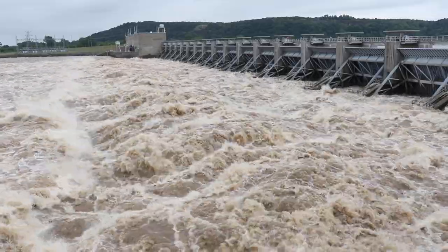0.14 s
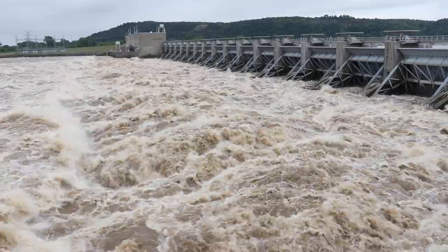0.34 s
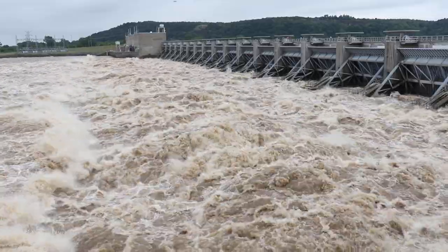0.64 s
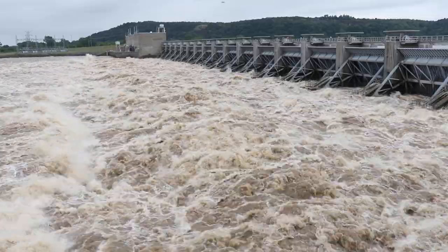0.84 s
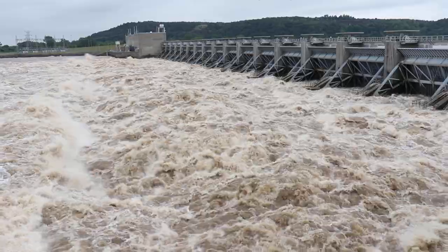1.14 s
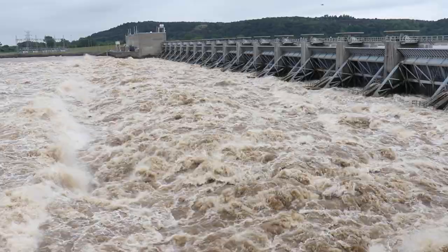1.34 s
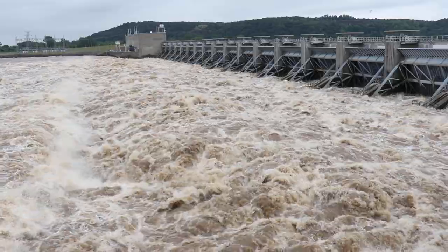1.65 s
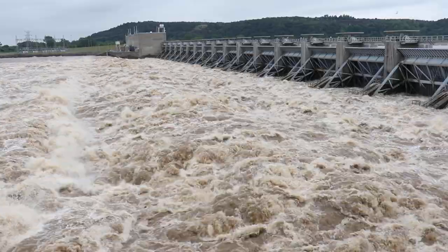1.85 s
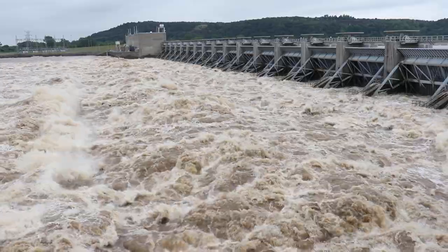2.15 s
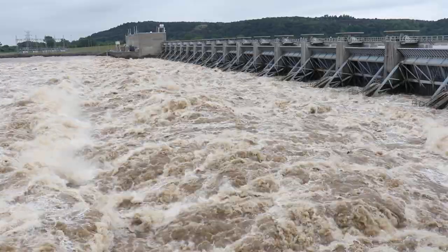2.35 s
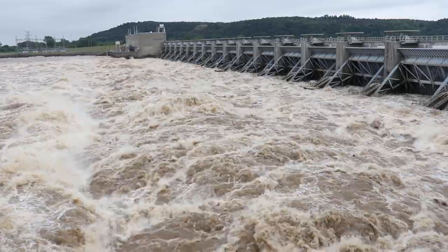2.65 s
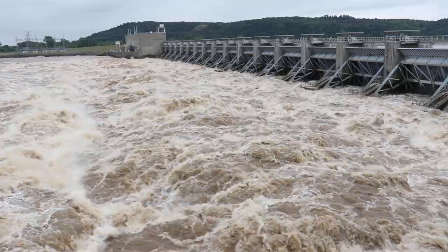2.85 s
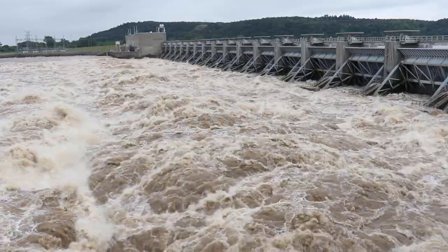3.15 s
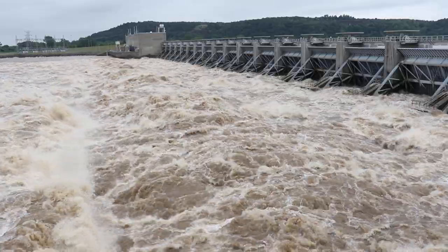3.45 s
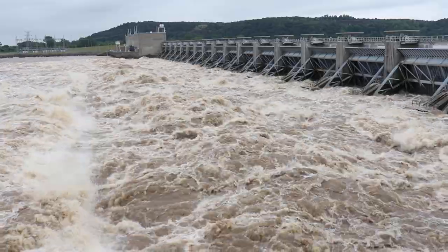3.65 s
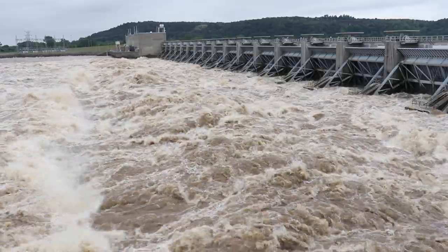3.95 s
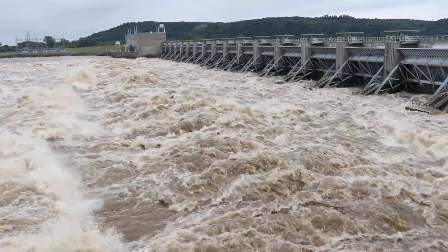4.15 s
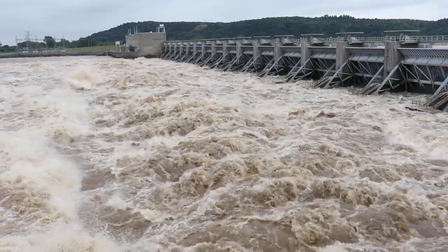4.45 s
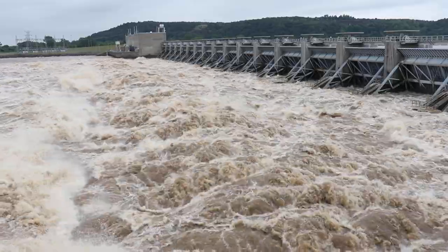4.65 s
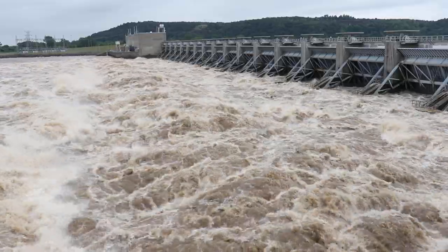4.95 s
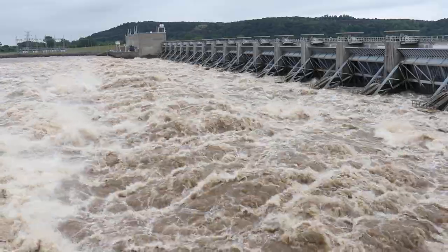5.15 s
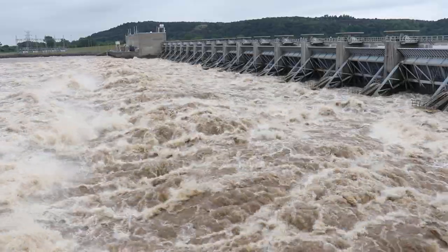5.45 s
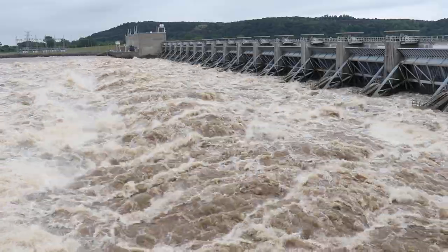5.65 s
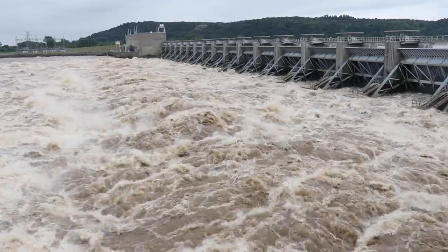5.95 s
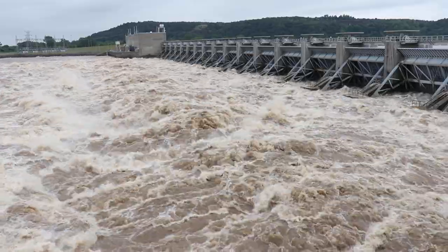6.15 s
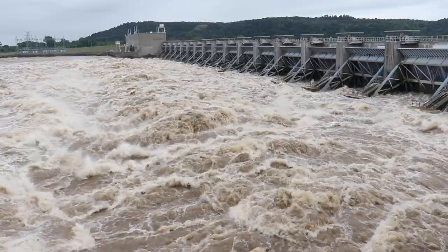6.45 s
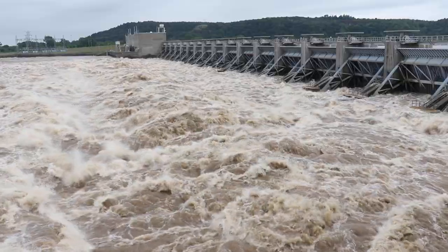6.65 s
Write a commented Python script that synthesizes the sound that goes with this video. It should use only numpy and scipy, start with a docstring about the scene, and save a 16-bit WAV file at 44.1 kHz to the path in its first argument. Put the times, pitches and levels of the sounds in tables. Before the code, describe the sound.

A loud, unbroken rush of churning river water, full in the middle, fizzing on top, gently heaving as nearby waves break.

```python
"""Below the gates of a dam, floodwater boils into whitewater, heard by a phone held above the tailrace.
Bubbles ring in clouds, from big air pockets to fine fizz: near ones are single rising rings,
far ones merge into a smooth roar made of noise bands. Standing waves surge and collapse:
plunging water drives the lows, churning foam the middle, spray the hiss.
Under it lies the faint rumble of the mass of water, low-passed noise that heaves."""
import sys
import numpy as np
from scipy import signal
from scipy.fft import rfft, irfft
from scipy.io import wavfile
from scipy.ndimage import uniform_filter1d

SR = 44100
rng = np.random.default_rng(int(sys.argv[2]) if len(sys.argv) > 2 else 0)


def pcm_store(signal):
    """Save signal as 16-bit PCM."""
    levels = np.round(np.clip(np.atleast_2d(signal), -1, 1) * 32767)
    wavfile.write(sys.argv[1], SR, levels.astype(np.int16).T)


N = 299880

LOWEST_HZ, TOP_HZ = 70, 15700  # biggest air pockets; finest fizz and the phone's upper limit


def undb(db):
    """Decibels to gain."""
    return 10 ** (np.asarray(db) / 20)


def level(x, db=0):
    """Scale a sound to an rms level in dB."""
    rms = np.sqrt(np.mean(x ** 2))
    return x * undb(db) / rms


def bin_hz():
    """Frequency of each spectrum bin, kept at 1 Hz or more so that its logarithm exists."""
    return np.maximum(np.arange(N // 2 + 1) * SR / N, 1)


def colour(x, points):
    """Shape a sound by (Hz, dB) points joined on a log-frequency axis."""
    hz, db = np.transpose(points)
    gain = undb(np.interp(np.log(bin_hz()), np.log(hz), db))
    return irfft(rfft(x) * gain, N)


def walk(rate):
    """Smooth random wandering of spread 1, from about rate fresh values a second."""
    hold = max(int(SR / rate), 1)
    steps = np.repeat(rng.standard_normal(N // hold + 1), hold)
    smooth = uniform_filter1d(uniform_filter1d(steps, hold), hold)
    return level(smooth[:N])


def surges():
    """Plunge, churn and spray in dB: each wave builds, holds and collapses on top of the boil."""
    # Waves breaking nearby. Each row: time of reaching full height in seconds, seconds held there,
    # dB the plunge lifts the lows, dB the spray lifts the hiss.
    breakers = [(0.29, 0.039, 1.5, 0.8), (0.53, 0.18, 1, 1.2), (0.82, 0.052, 1.6, 1), (1.15, 0.055, 1.1, 2),
                (1.58, .25, 1.8, 1), (1.99, 0.033, 3.5, 1.5), (2.18, 0.13, 1.1, .2),
                (2.65, 0.059, 3.2, 1.4), (3.10, .11, 1.7, 1.2), (3.52, 0.22, 1, 1.5), (4.00, .12, 0.9, 1.4),
                (4.53, .26, 1.2, 2), (5.01, .04, 0.1, 1.5), (5.28, .13, .5, 0.8), (5.94, .13, 1.5, 1),
                (6.27, 0.059, 1.5, 0.3), (6.58, 0.098, 2.1, 1)]
    # The boiling water between the breakers. Each row: time in seconds, level in dB before centring.
    boil_level = [(0, 0.5), (1.8, 0.18), (2.45, -0.16), (4.0, 0.37), (4.33, -0.1), (4.65, 0.15), (5.6, 0),
                  (5.95, 0.5), (6.8, -0.16)]
    rise_s, fall_s = 0.1, 0.12  # every wave builds and collapses alike
    churn_plunge_share, churn_spray_share = 0.46, 0.15  # the foam churns with both
    spray_follows = 2.1  # dB of spray per dB of boil

    t = np.arange(N) / SR
    plunge, spray = np.zeros(N), np.zeros(N)
    for at, hold, plunge_db, spray_db in breakers:
        height = np.interp(t, [at - rise_s, at, at + hold, at + hold + fall_s], [0, 1, 1, 0])
        plunge += plunge_db * height
        spray += spray_db * height
    churn = churn_plunge_share * plunge + churn_spray_share * spray
    boil = np.interp(t, *np.transpose(boil_level))
    swells = np.array([plunge + boil, churn + boil, spray + spray_follows * boil])
    return swells - swells.mean(axis=1, keepdims=True)  # each part swings around 0 dB


def far_roar(hz, ratio):
    """Distant bubbles merged into noise around hz, fading out at the bands a frequency ratio away."""
    offset = np.clip(np.log(bin_hz() / hz) / np.log(ratio), -1, 1)
    band_gain = np.cos(np.pi / 2 * offset)
    return level(irfft(rfft(rng.standard_normal(N)) * band_gain, N))


def near_bubbles(hz, per_s, cycles, rise, spread_db):
    """Bubbles of one size: each rings briefly as it is pinched off, rising in pitch towards the surface."""
    born = rng.random(N) < per_s / SR
    strength = undb(spread_db * np.clip(rng.standard_normal(N), -2, 2))
    polarity = np.sign(rng.standard_normal(N))
    age = np.linspace(0, 1, int(cycles * SR / hz) + 2)  # share of the ring's life
    decay = np.exp(-np.log(1000) * age)  # 60 dB over its life
    ring = decay * np.sin(2 * np.pi * cycles * age * (1 + rise * age / 2))
    return level(signal.oaconvolve(born * (strength * polarity), ring)[:N])


def whitewater(near_db=-7, bubbles_per_s=900, flicker_db=0.33, flicker_rate=14,
               slosh_db=0.32, slosh_rate=16, count=24):
    """Far roar and near rings per bubble size; all swell with the waves, slosh together and flicker alone."""
    # Colour of the whitewater. Each row: frequency in Hz, relative level in dB per Hz.
    water = [(50, -60.0), (80, -39), (115, -17.5), (185, -6.5), (300, -2), (550, 0.0), (1100, -0.24),
             (3200, -5), (4000, -8), (5100, -11), (7900, -8), (10000, -12), (13000, -20), (15500, -30)]
    # Pitch in Hz around which each part of a wave sounds: plunge, churn, spray.
    breaker_hz = [500, 1997, 10000]

    surges_db = surges() + slosh_db * walk(slosh_rate)
    pitches = np.geomspace(LOWEST_HZ, TOP_HZ, count)
    out = np.zeros(N)
    for hz in pitches:
        far = far_roar(hz, pitches[1] / pitches[0])
        # small bubbles far outnumber big air pockets; bubbles_per_s holds at the churn's pitch
        per_s = bubbles_per_s * hz / breaker_hz[1]
        near = near_bubbles(hz, per_s, cycles=13, rise=0.15, spread_db=4)
        # how much this pitch follows the plunge, the churn and the spray
        shares = np.array([np.interp(np.log(hz), np.log(breaker_hz), part)
                           for part in np.eye(len(breaker_hz))])
        swell_db = shares @ surges_db + flicker_db * walk(flicker_rate)
        # higher bands are wider and so hold more power
        out += np.sqrt(hz) * undb(swell_db) * (far + undb(near_db) * near)
    return level(colour(out, water), -18)


def gate_rumble(heave_db=0.5, heave_rate=4):
    """Deep turbulence of the mass of water under the gates: low noise whose level wanders."""
    # Colour of the rumble. Each row: frequency in Hz, relative level in dB per Hz.
    rumble = [(12, -34), (20, -6), (38, 3), (70, 0), (80, -6), (100, -31), (180, -120)]
    turbulence = colour(rng.standard_normal(N), rumble)
    return level(turbulence * undb(heave_db * walk(heave_rate)), -65)


def scene():
    """One microphone hears the river and feeds both channels."""
    river = whitewater() + gate_rumble()
    return np.array([river, river])


def record(dry):
    """The phone cuts the top steeply, with an elliptic low-pass."""
    low_pass = signal.ellip(12, 0.1, 80, TOP_HZ, fs=SR, output="sos")  # 0.1 dB ripple, 80 dB down
    return signal.sosfilt(low_pass, dry)


dry = scene()
out = record(dry)
pcm_store(out)
```